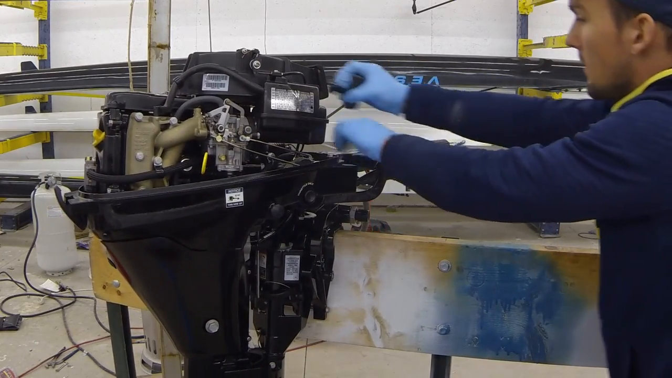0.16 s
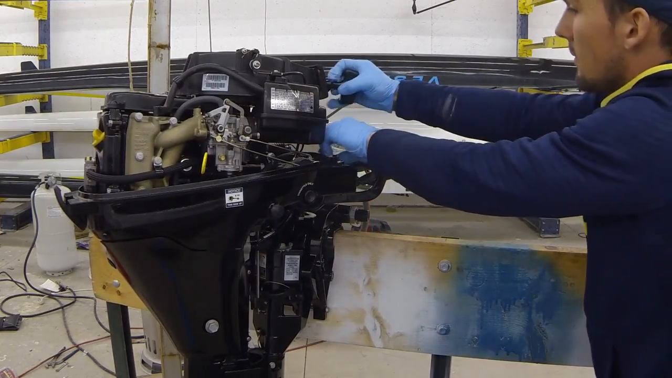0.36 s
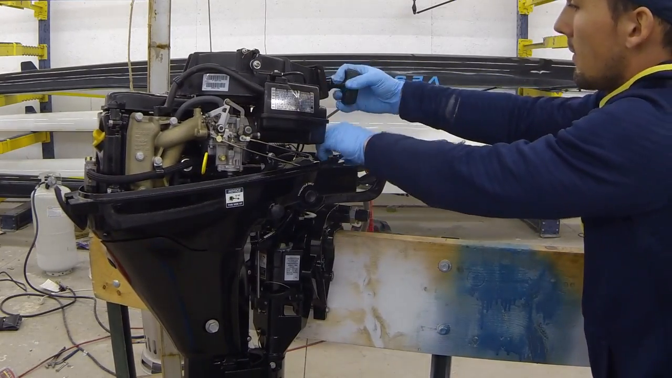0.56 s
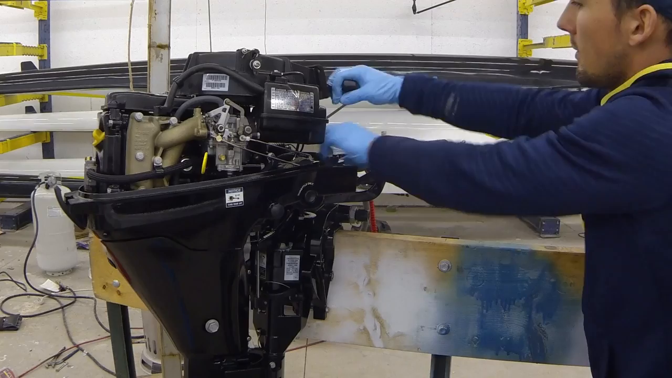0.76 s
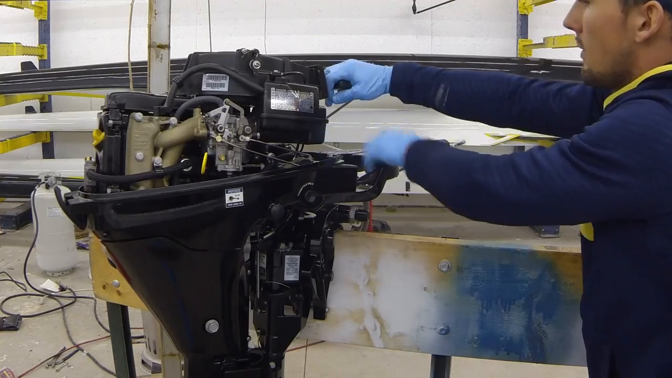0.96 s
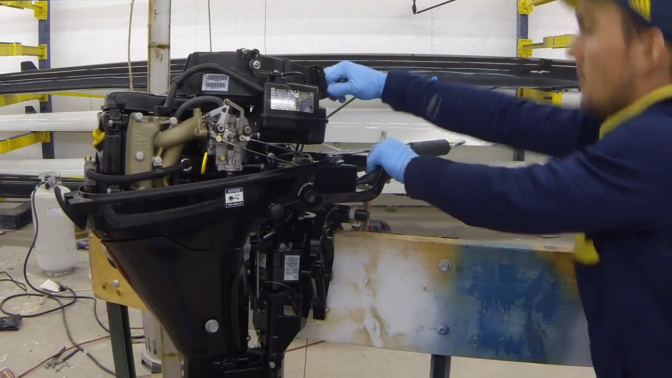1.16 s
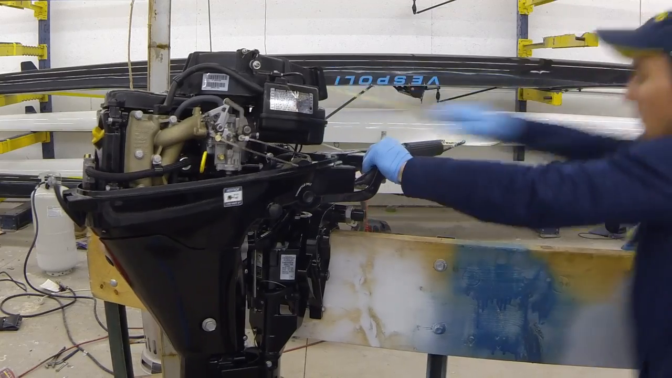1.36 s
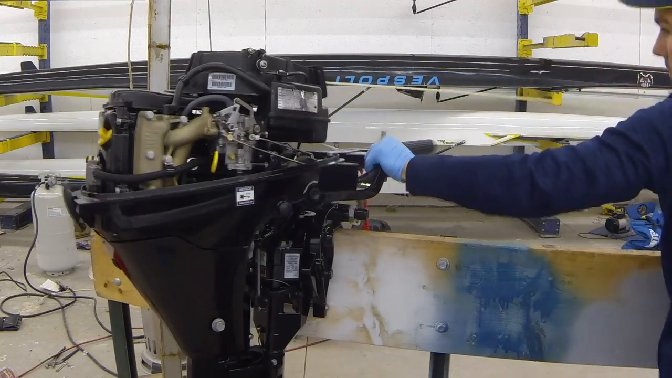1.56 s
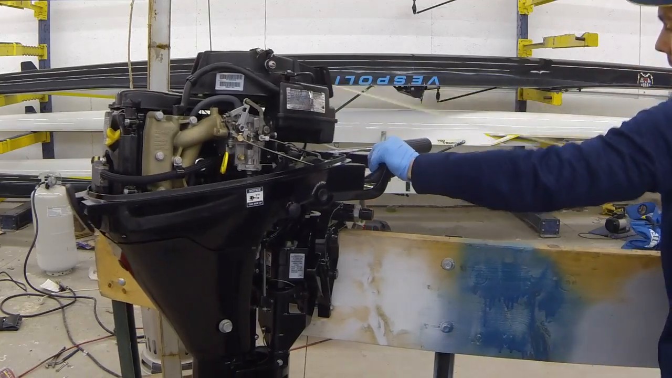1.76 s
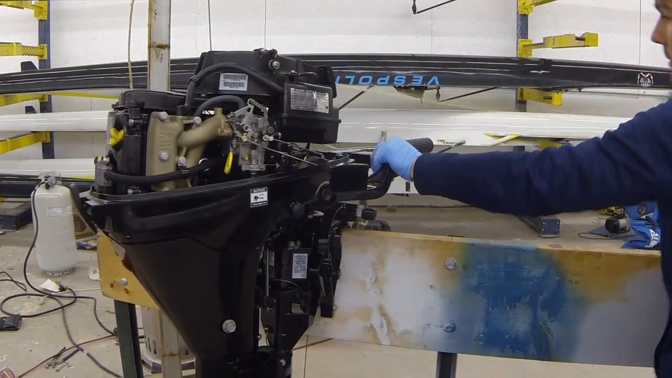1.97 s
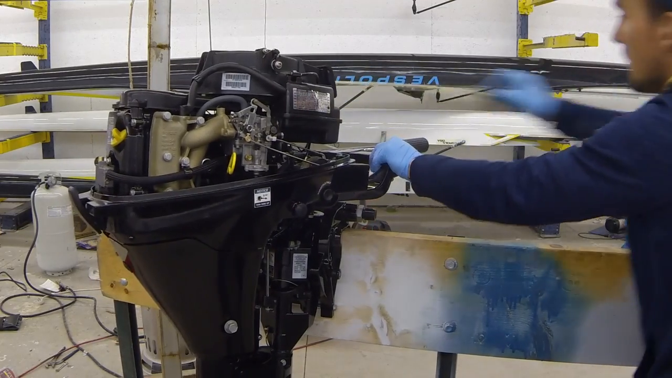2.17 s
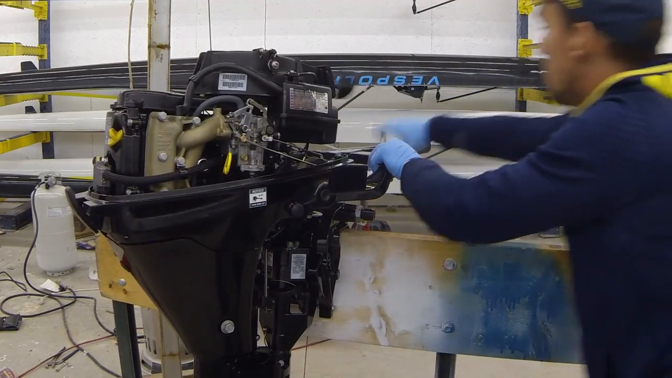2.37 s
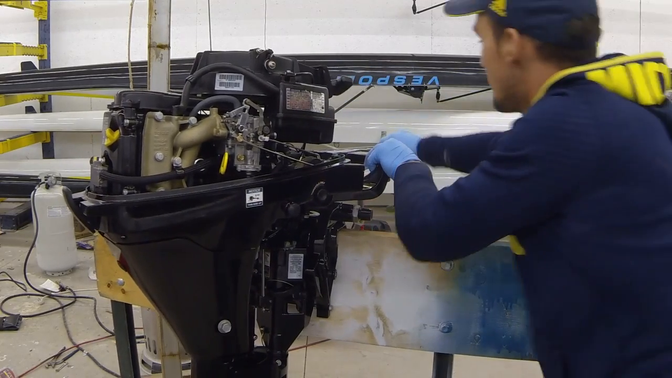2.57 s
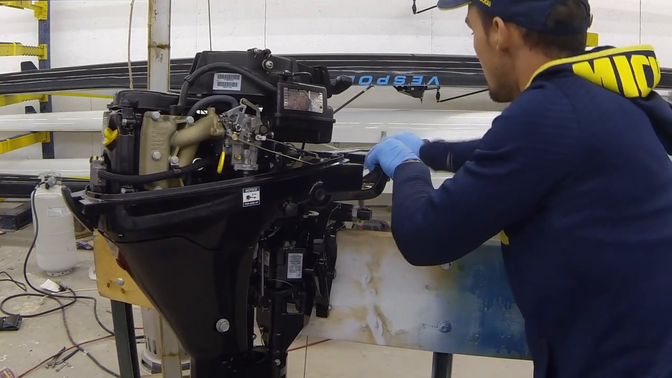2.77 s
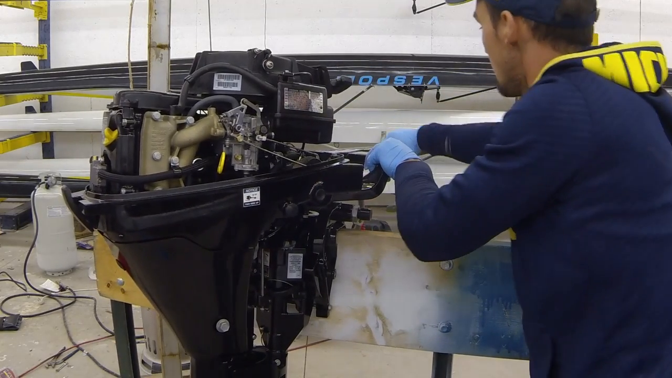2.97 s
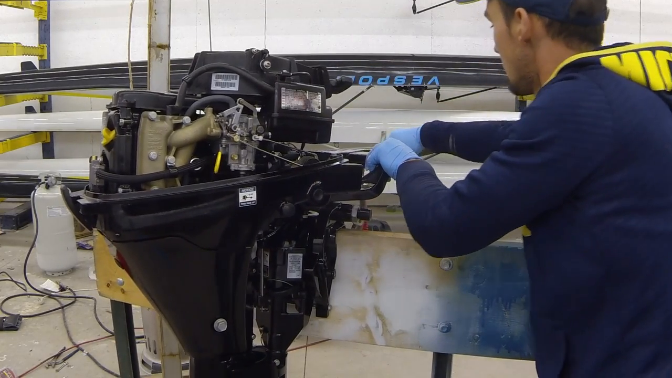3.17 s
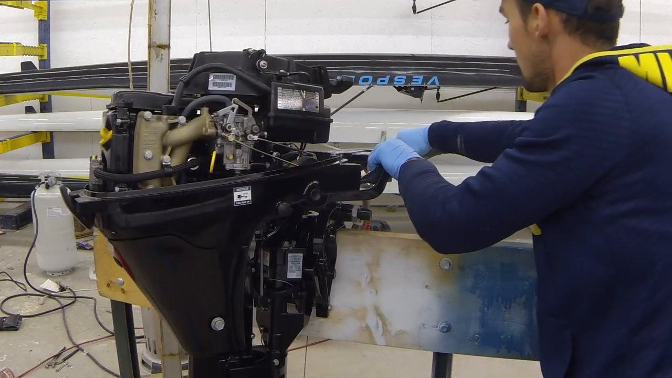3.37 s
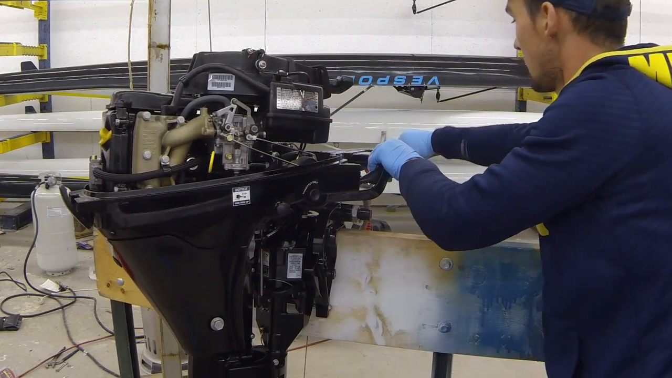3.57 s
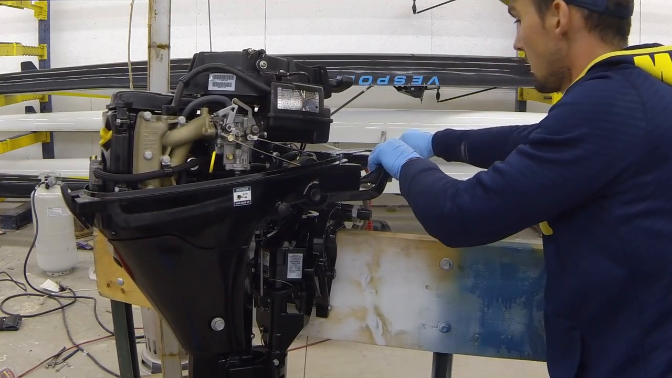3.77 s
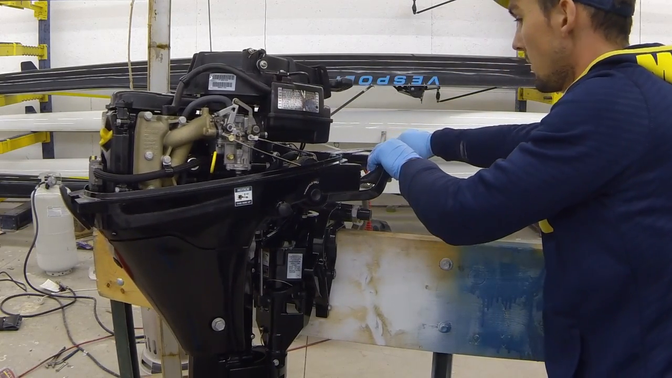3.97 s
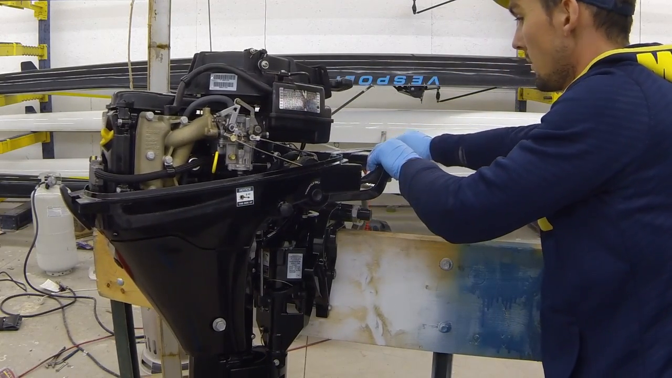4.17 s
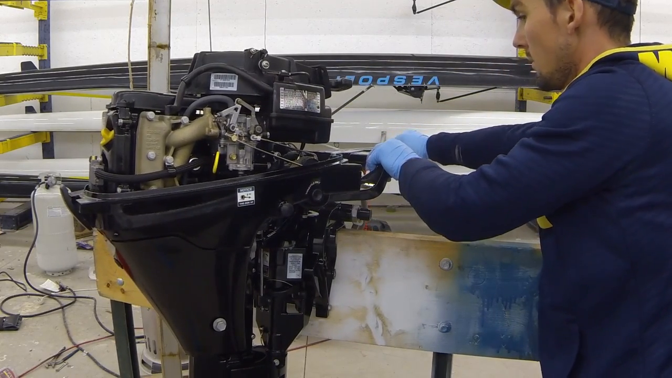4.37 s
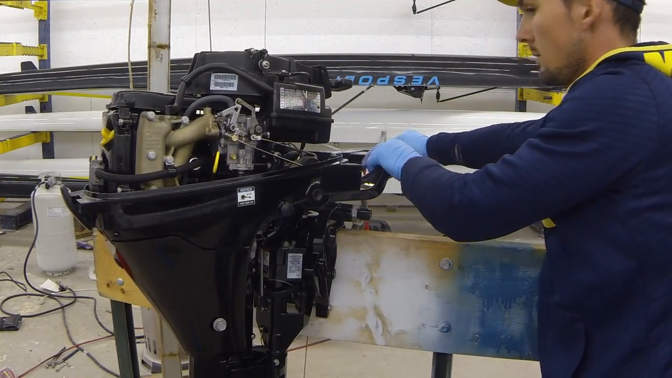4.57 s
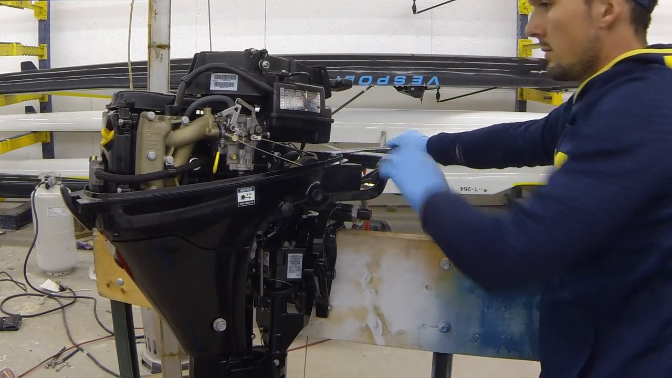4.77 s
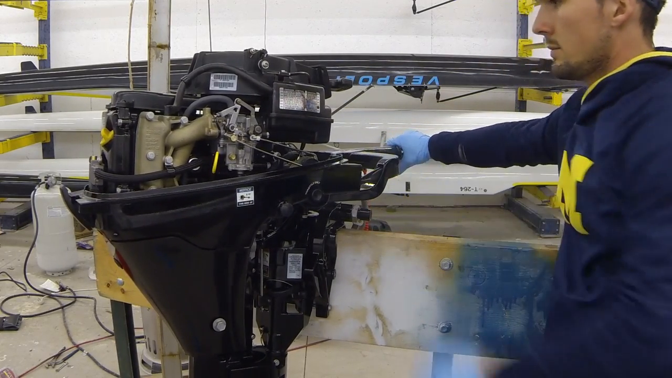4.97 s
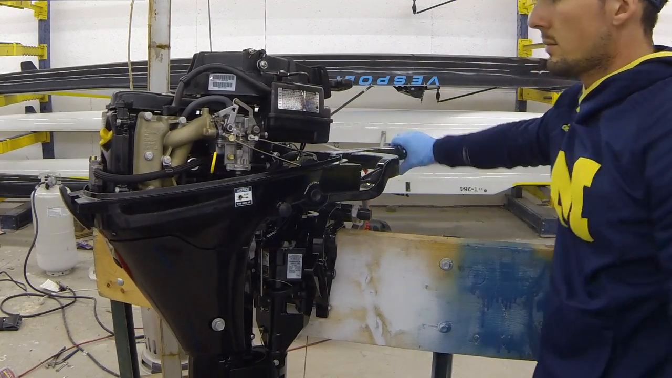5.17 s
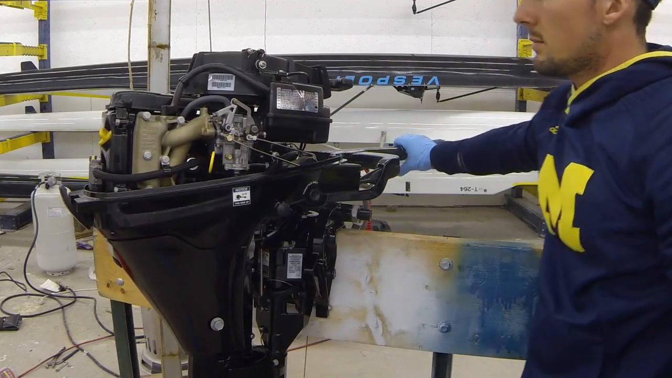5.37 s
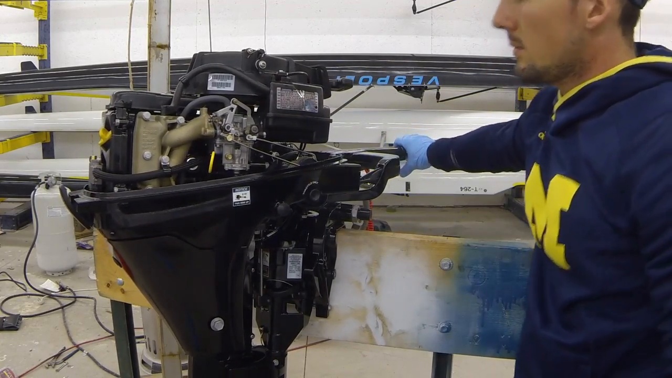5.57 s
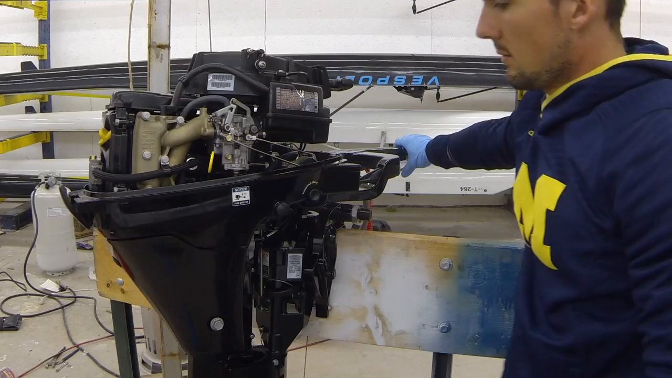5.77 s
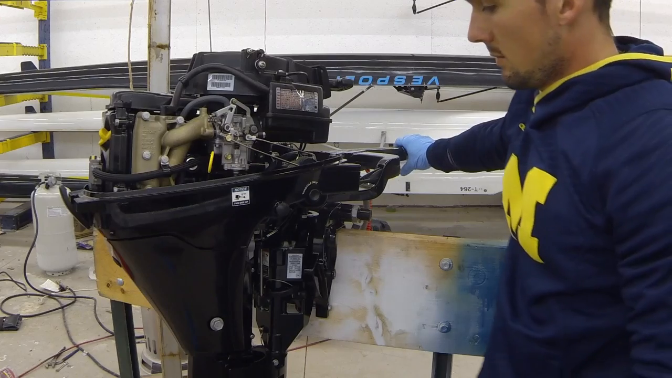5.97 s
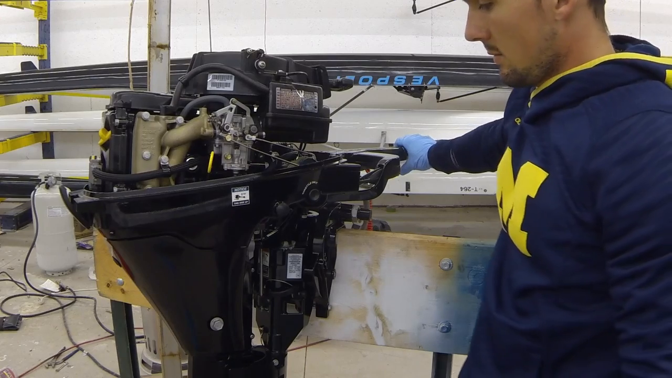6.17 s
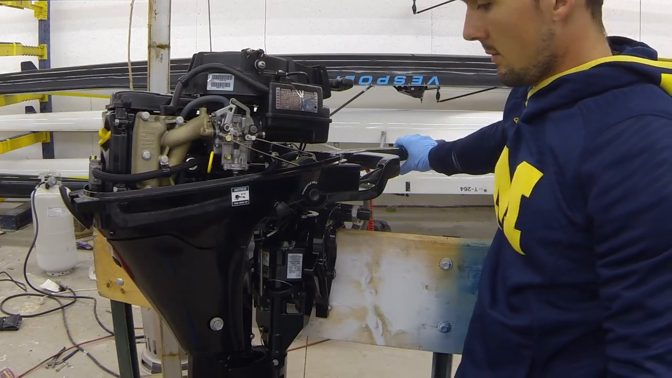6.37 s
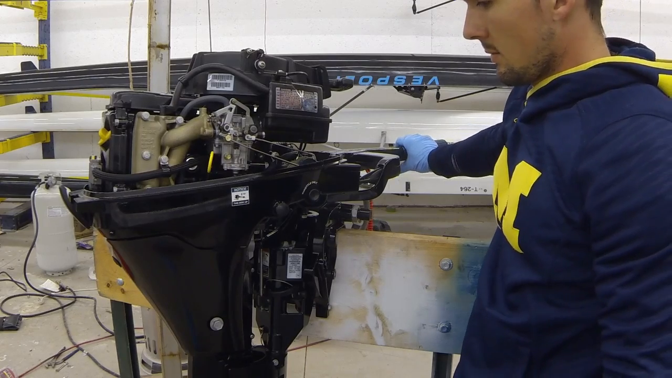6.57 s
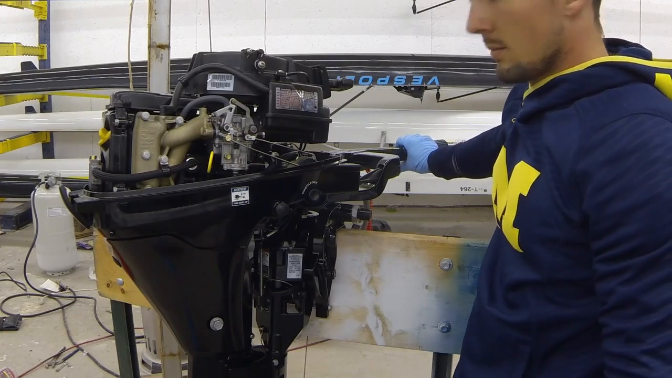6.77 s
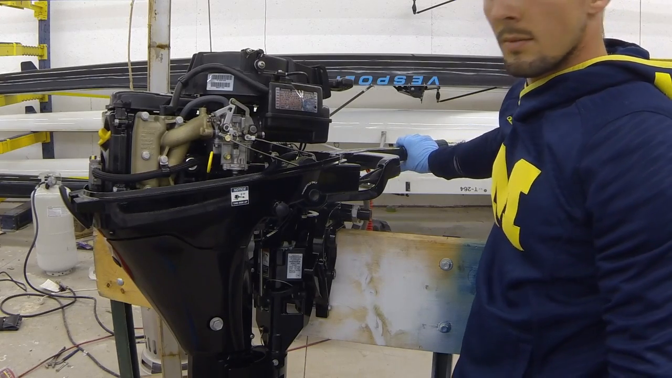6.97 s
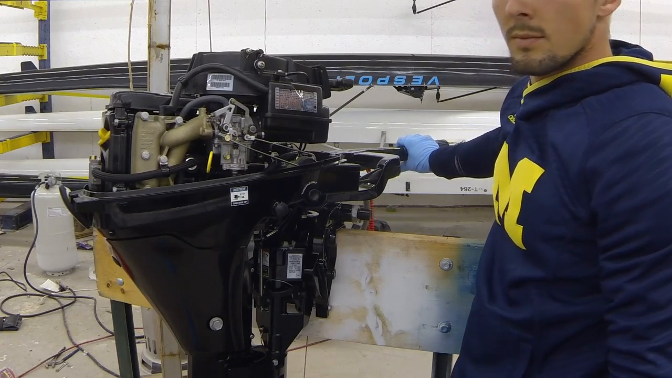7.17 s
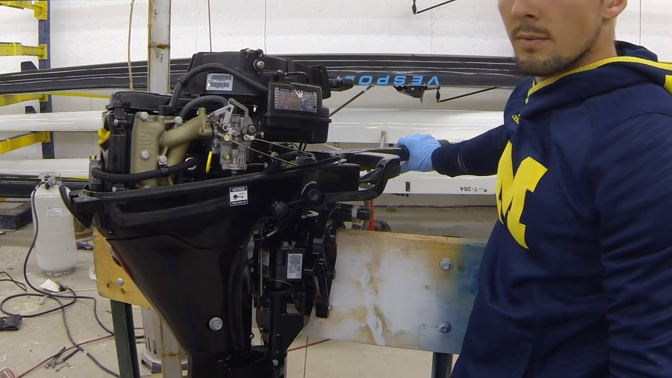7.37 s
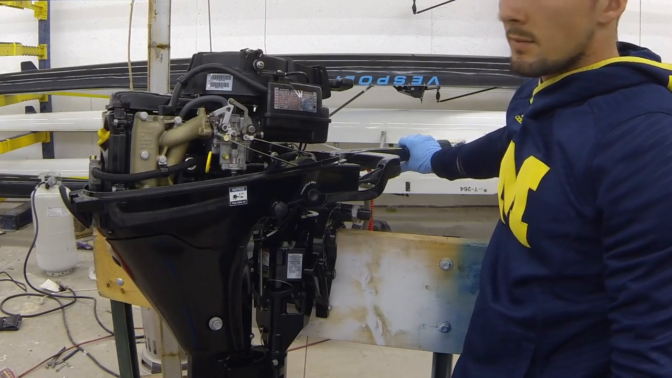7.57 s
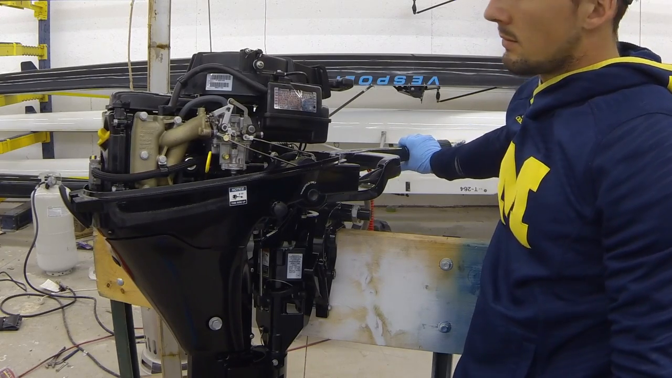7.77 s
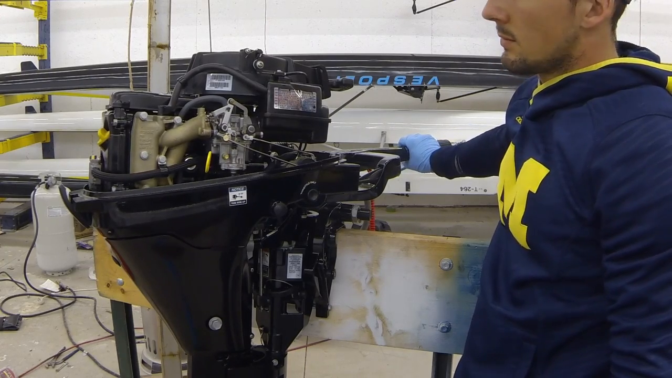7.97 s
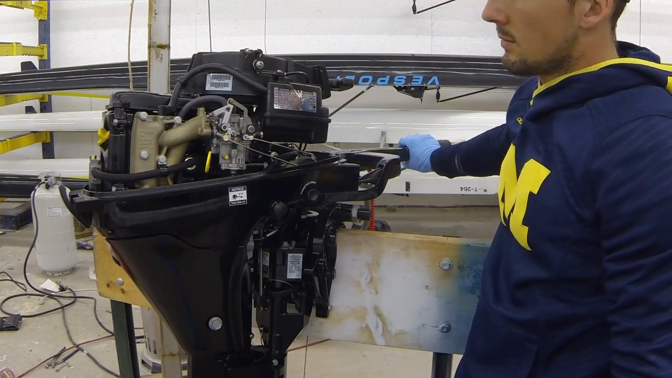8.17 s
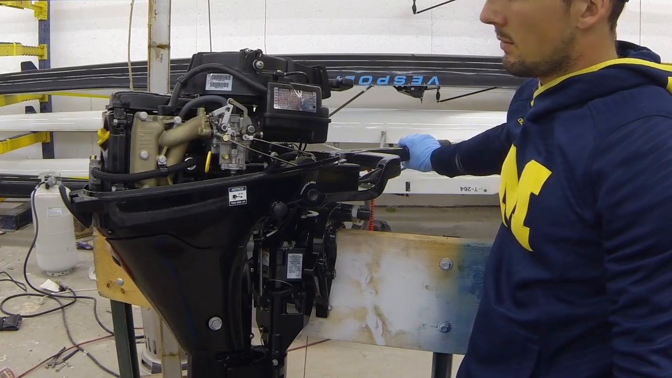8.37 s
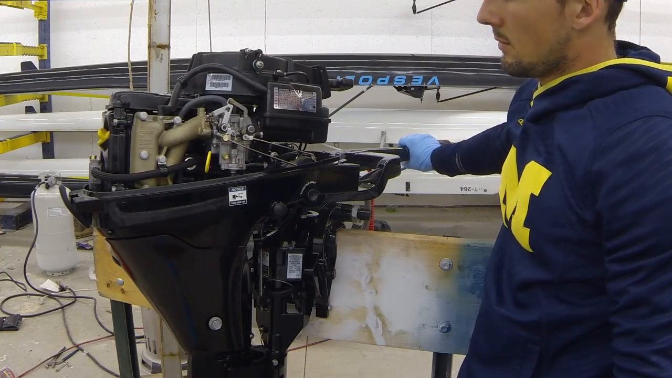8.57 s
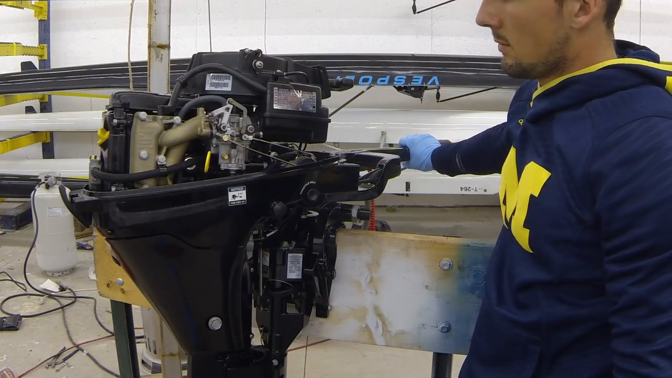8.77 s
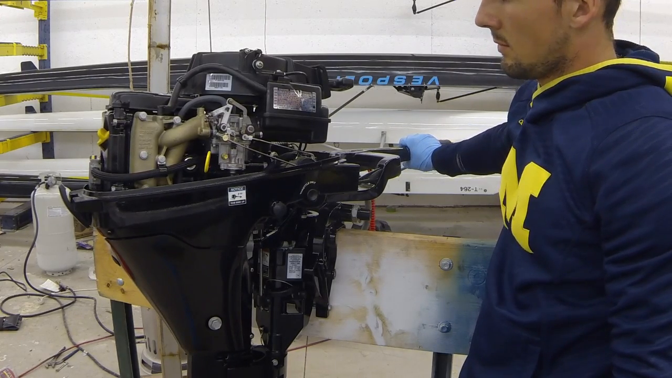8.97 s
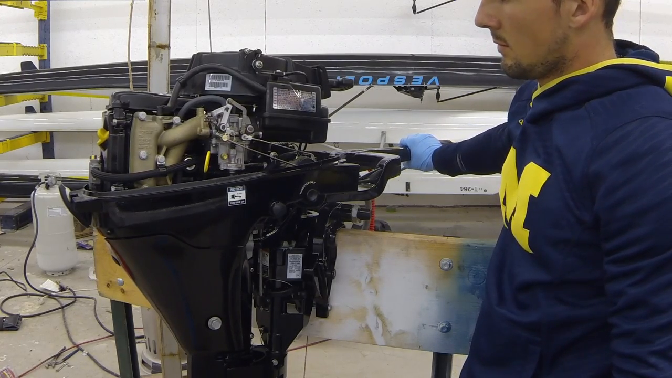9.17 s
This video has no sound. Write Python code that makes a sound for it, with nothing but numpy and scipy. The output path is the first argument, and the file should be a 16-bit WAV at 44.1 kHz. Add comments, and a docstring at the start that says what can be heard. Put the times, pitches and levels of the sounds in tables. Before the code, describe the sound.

Starter knocks and a rope whirr fire up a small outboard engine, which races with misfires, sags, and recovers to an even putter.

```python
"""In a workshop, a small twin-cylinder outboard motor is started on a stand. The handle knocks home twice,
exciting the housing's modes, and the rope spins a whirring pulley. The motor catches, races with misfires,
nearly stalls, and settles to an even run that sags at the end. Each firing is an impulse: a puff drives
the air column of the dry exhaust leg, a knock drives the bare block, and a gulp of air sounds the intake.
The room reverberates over a low rumble."""
import sys
import numpy as np
from scipy import signal
from scipy.fft import rfft, irfft, next_fast_len
from scipy.io import wavfile
from scipy.ndimage import uniform_filter1d

SR = 44100
rng = np.random.default_rng(int(sys.argv[2]) if len(sys.argv) > 2 else 0)


def waveform_to_disk(signal):
    """Save audio, clipped to [-1, 1], as 16-bit WAV at the path in sys.argv[1]."""
    frames = np.transpose(np.atleast_2d(signal))
    scaled = np.clip(frames, -1, 1) * 32767
    samples = np.round(scaled).astype(np.int16)
    wavfile.write(sys.argv[1], SR, samples)


N = 407043
TIME = np.arange(N) / SR
CHOKE_OFF_S, CHOKE_FADE_S = 3.58, 0.466
COASTING_DB = 18  # softness around which the motor coasts

# Relative spectra of room noise and of an earlier knock's ring (frequency [Hz], density [dB])
ROOM_SPECTRUM = [(8.8, -36), (15, 7), (48, 8), (152, -9), (186, -18), (215, -14.5), (339, -16.5),
                 (951, -16), (1200, -13), (1730, -22.5), (14000, -40.5)]
RING_SPECTRUM = [(150, -46), (250, -17), (548, -9), (634, -7), (920, -15), (2180, -18), (2530, -21),
                 (2670, -24), (6000, -37), (7800, -37), (13200, -120)]
# Reverberation of the workshop (frequency [Hz], T60 [s])
ROOM_DECAY = [(100, 1), (600, 1), (1500, 0.78), (4000, 0.83), (10000, 0.68)]
# Blows of handle and pawl (time [s], level [dB], low modes [dB], ping [dB], high modes [dB])
STARTER_KNOCKS = [(0.246, -20.5, 3, 4, -18), (0.89, -30.5, -3, 3.5, -18), (0.901, -35.5, -21, -12, -8),
                  (1.245, -48, -11, 15, 15), (1.299, -44, 0, -7, -7), (1.331, -35, -23, 14, 8),
                  (1.365, -17, 8, 10, 7), (1.369, -8, -4, 7, 6.5), (1.382, -19, 3, 12, 3),
                  (1.601, -17, -5, -1, -7), (1.61, -10.5, -31, -7, -3), (1.641, -18, -23, -4, 8),
                  (1.691, -33, -16, -23, -28)]
# Modes of the starter housing (frequency [Hz], level [dB], T60 [s])
HOUSING_MODES = [(474, 4, 0.035), (631, -4.5, 0.3), (682, 8, 0.09), (856, -16, 0.014), (980, 8, 0.026),
                 (1123, 6, 0.076), (1222, 1, 0.031), (1360, 13.5, 0.03), (1435, 17, 0.031),
                 (1508, 17.5, 0.025), (2020, 2, 0.017), (2910, -3, 0.016), (3093, 1.5, 0.016),
                 (4000, 7.5, 0.01), (4940, 0, 0.013), (7660, -27, 0.057)]
# Relative spectrum of the pulley (frequency [Hz], density [dB])
PULLEY_SPECTRUM = [(35, -33), (60, -9), (114, -7), (417, -12), (658, -3), (927, -9), (1460, -9),
                   (1840, -15), (2160, -7.5), (7740, -40), (14000, -68)]
# Pitch of its whirr (time [s], frequency [Hz])
WHIRR_PITCH = [(1.39, 1390), (1.45, 1360), (1.5, 1580), (1.55, 1140), (1.7, 1600)]
# Speed of the motor (time [s], firing rate [Hz])
FIRING_RATE = [(1.45, 8.3), (1.597, 13.16), (1.703, 24.25), (1.788, 22.4), (1.978, 26.68), (2.222, 45.07),
               (2.513, 49.09), (2.871, 44.76), (3.058, 48.88), (3.068, 46.58), (3.25, 39.43), (3.42, 28.83),
               (3.58, 23.68), (3.74, 17.08), (3.9, 21.46), (4.1, 25.5), (4.3, 32.0), (4.45, 33.69),
               (4.8, 34.18), (5.1, 34.39), (5.4, 34.4), (5.7, 34.51), (5.85, 33.6), (6.0, 34.66),
               (6.25, 34.56), (6.5, 34.75), (6.75, 34.73), (7.0, 34.6), (7.15, 34.76), (7.3, 35.2),
               (7.5, 34.77), (7.8, 35.56), (8.05, 35.23), (8.3, 35.87), (8.5, 34.94), (8.7, 34.52),
               (8.85, 31.88), (9.0, 29.68), (9.23, 27.23)]
# Strength of firing (time [s], puff [dB], knock [dB])
FIRING_LOAD = [(1.5, -45.5, -42), (1.58, -30, -54), (1.63, -19, -17.5), (1.73, -18, -18), (1.82, -22, -25),
               (2.04, -17, -20), (2.4, -14, -23.5), (2.72, -17.5, -23.5), (2.87, -23, -37.5),
               (2.91, -15.5, -23), (3.03, -17.5, -29.5), (3.13, -19.5, -39), (3.5, -23.5, -50),
               (3.62, -23, -50), (3.72, -17, -30.5), (3.81, -21.5, -30.5), (3.88, -17, -20.5),
               (4.0, -17, -19.5), (4.3, -17.5, -25.5), (4.5, -18, -30), (5.6, -15.5, -29),
               (6.6, -14.5, -27), (8.4, -15, -29.5), (8.9, -15.5, -31.5), (9.23, -14.5, -29.5)]
# Firings that fall short or hit hard (time [s], puff change [dB], knock change [dB])
UNEVEN_FIRINGS = [(1.764, -10, -30), (1.723, -3, 1.5), (1.809, -4.5, 5), (1.852, 0, 3), (1.893, 0, 7),
                  (1.933, -1.5, 5), (1.971, -2, 1), (2.008, -4, 2.5), (2.04, -1, 1), (2.072, 3, -0.5),
                  (2.1, -2, 2.5), (2.126, 4.5, 3), (2.176, 0.5, -1), (2.223, -2, 1.5), (2.246, -4, -0.5),
                  (2.268, -2.5, 1.5), (2.289, -8, -3), (2.311, -2, 2.5), (2.332, -1.5, 1), (2.353, -2, -7),
                  (2.395, -1.5, -0.5), (2.416, -1, 2), (2.437, -6, -21), (2.458, -3.5, -1),
                  (2.479, -3, 0.5), (2.52, -6.5, -11), (2.541, -1, 0), (2.561, -29, -17), (2.582, 1.5, 3),
                  (2.602, -37, -20), (2.687, -43, -15), (2.729, -25, -8), (2.75, 5, 4.5), (2.772, -29, -30),
                  (2.816, -27, -4), (2.86, -33, -2), (2.906, -0.5, 1.5), (2.928, -2.5, 1), (2.949, -10, -8),
                  (3.075, -2, -6), (3.097, -5, 2), (3.444, -7, -21), (3.477, -8, -10), (3.559, -3.5, 2),
                  (3.519, -6, 7), (3.602, -6, 4), (3.647, -4.5, 5.5), (3.698, -5, -1), (3.755, -9.5, -3.5),
                  (3.907, 0, 1), (3.952, -0.5, -0.5), (3.996, -3, -4), (4.038, -0.5, -3.5), (4.079, 0, 0),
                  (4.226, -1.5, 1.5), (4.291, 1.5, 1), (4.353, 1, 0), (4.827, 2, 3), (5.003, 0.5, 4),
                  (5.41, 1, 2), (5.47, 1, 1.5), (5.586, 0.5, 4), (6.169, -0.5, 3), (6.544, -1, 0),
                  (6.573, -0.5, 3.5), (6.688, 0.5, 0), (6.745, 1.5, 0), (6.802, 2, 3), (6.861, -1, 2.5),
                  (6.919, -0.5, 3.5), (6.976, -1, 2), (7.033, 0.5, 0.5), (7.092, 1.5, 3.5), (7.293, 0.5, 1),
                  (7.521, -0.5, 4), (7.608, 0.5, 2.5), (7.663, 1.5, 3.5)]
# Intake resonance (time [s], frequency [Hz], drive relative to the puff [dB])
INTAKE_NOTE = [(1.6, 840, 9.5), (2.0, 830, 8.5), (2.2, 855, 7), (2.7, 837, 4.5), (3.03, 858, 6),
               (3.18, 774, 3), (3.5, 726, 4), (3.75, 830, -3), (4.1, 820, 2), (6.0, 820, -2.5),
               (8.0, 819, -3.5), (9.23, 820, -3)]
# Modes of the block (frequency [Hz], bandwidth [Hz], gain on choke [dB], gain off choke [dB])
BLOCK_MODES = [(620, 254, -3.5, -10.5), (705, 150, -26, -9), (1147, 59, -20, -4), (1284, 110, -38, -1),
               (1363, 164, -2, -29), (1614, 99, -3.5, -0.5), (1793, 180, -3, -16), (2137, 120, -7, -1.5),
               (2403, 196, -0.5, -3.5), (2693, 190, -6, -5), (3068, 400, -9.5, -11.5), (3445, 81, -6.5, -9),
               (3696, 110, -8.5, -9.5), (4260, 91, -9.5, -30), (4680, 330, -12.5, -9.5),
               (5235, 310, -10.5, -12), (5670, 82, -15, -9.5), (5850, 115, -10, -18),
               (6670, 150, -15.5, -15), (7920, 1170, -19, -19), (10000, 2800, -26.5, -25.5)]
# Valve gear rattle (time [s], level [dB])
VALVE_RATTLE = [(1.45, -48), (1.8, -55), (2.2, -34.5), (3.0, -32.5), (3.3, -34), (3.5, -39.5),
                (3.75, -38.5), (4.0, -26), (4.4, -31.5), (8.6, -31.5), (9.23, -34.5)]
# Relative spectrum of the broadband rattle (frequency [Hz], density [dB])
RATTLE_SPECTRUM = [(40, -29), (240, 0.5), (400, -8.5), (1900, -14.5), (2660, -12), (4050, -17),
                   (4760, -19.5), (8280, -23.5), (13000, -28.5)]
# Reflections in the leg, inverted by the open end (delay [ms], amplitude [ratio])
LEG_ECHOES = [(2.45, -.8), (7.2, .8), (12.7, .3), (23.2, .21)]
STALL_ECHOES = [(-2.1, .45), (3.1, -1.15), (7.8, .35), (12.9, .3), (23.5, .15)]  # near a stall the valve cracks open early
CHOKE_ECHOES = [(-2.6, -.2), (2.5, -.2), (6.2, .4), (8.3, -.25)]
# Suction pulse (time [s], level relative to the puff [dB])
SUCTION_LEVEL = [(1.45, -8), (2.0, -16), (2.4, -8), (2.87, -6), (2.91, -9), (3.13, -9), (3.3, -1),
                 (3.55, 4), (3.72, -8), (3.88, 0), (4.3, -11.5), (4.5, 3.5), (8.7, -1), (9.23, -1.5)]
# Exhaust bass (time [s], gain [dB])
BASS_GAIN = [(1.5, 3.5), (2.1, 6), (2.6, -1.5), (3.1, 6.5), (3.8, -2.5), (4.3, 6), (4.7, 1.5), (6.0, -0.5),
             (7.0, -1), (8.0, 4), (8.7, 1), (9.23, 0)]
# Response of a small housed microphone (frequency [Hz], gain [dB])
MIC_RESPONSE = [(25, 1.5), (45, -3), (70, 2.5), (110, 1.5), (9000, -1), (12000, -12), (15000, -24)]


def amp(db):
    """Decibels to amplitude ratio."""
    return 10 ** (np.asarray(db) / 20)


def unit_rms(x):
    """Normalisation to rms 1."""
    return x / np.sqrt(np.mean(x ** 2) + 1e-20)


def at_hz(table, hz):
    """Interpolation on a log-frequency axis."""
    f, value = np.transpose(table)
    return np.interp(np.log(hz + 1), np.log(f + 1), value)


def curve(table, column=1, before=-120):
    """Linear interpolation of a column over time."""
    rows = np.array(table)
    return np.interp(TIME, rows[:, 0], rows[:, column], left=before)


def filtered(x, spectrum):
    """Filtering by multiplication of spectra."""
    size = next_fast_len(N)
    return irfft(rfft(x, size) * amp(at_hz(spectrum, np.fft.rfftfreq(size, 1 / SR))), size)[..., :N]


def cut(x, order, hz, kind="low"):
    """Zero-phase filtering, forward then backward."""
    return signal.sosfiltfilt(signal.butter(order, hz, kind, fs=SR, output="sos"), x)


def resonate(x, hz, width, stages=1):
    """Resonance by heterodyning: each stage shifts hz to zero, smooths, and shifts back."""
    turn, pole = np.exp(2j * np.pi * np.cumsum(hz * np.ones(N)) / SR), np.exp(-np.pi * width / SR)
    for _ in range(stages):
        x = 2 * (turn * signal.lfilter([1 - pole], [1, -pole], x / turn)).real
    return x


def train(at, size):
    """Impulse train at the given samples."""
    return np.bincount(np.clip(at, 0, N - 1), size, N)


def burst(at, size, rise_s, fall_s):
    """Transient envelope: vibration swells and decays after each stroke."""
    t = np.arange(1500) / SR
    swell = (t / rise_s) * np.exp(1 - t / rise_s)
    tail = 0.5 * (1 - np.exp(-t / rise_s)) * np.exp(-t / fall_s)
    return signal.oaconvolve(train(at, size), swell + tail)[:N]


def wander():
    """Slow random modulation: twelve summed sines, rms 1."""
    hz, phase, steps = np.geomspace(0.3, 2.5, 12), rng.random(12), TIME[::441]
    return unit_rms(np.interp(TIME, steps, np.sin(2 * np.pi * (np.outer(steps, hz) + phase)).sum(axis=1)))


def scatter(at):
    """Gaussian variation, one value a stroke."""
    return rng.standard_normal(400)[:len(at)]


def room_noise():
    """Steady rumble and air, with the exponential decay of an earlier knock."""
    air, ring = rng.standard_normal((2, N))
    return (amp(-48.5) * unit_rms(filtered(air, ROOM_SPECTRUM))
            + amp(-48 - 33 * TIME) * unit_rms(filtered(ring, RING_SPECTRUM)))


def reverberation(x):
    """Diffuse reflection: sparse echoes of random sign, each band decaying at its own rate."""
    taps = np.zeros(SR)
    at = np.arange(400, SR - 20, 20) + rng.integers(0, 20, (SR - 401) // 20)
    taps[at] = rng.choice([-1., 1.], len(at))
    hz, t, bands = signal.stft(taps, SR, nperseg=256)
    tail = signal.istft(bands * amp(-60 * t / at_hz(ROOM_DECAY, hz)[:, None]), SR, nperseg=256)[1]
    return signal.fftconvolve(x, tail / np.linalg.norm(tail))[:N]


def starter_knocks():
    """Impact excitation: handle and pawl set the housing's damped modes ringing."""
    t, out = np.arange(6000) / SR, np.zeros(N + 6000)
    spots = rng.uniform(-0.39, 1, (len(STARTER_KNOCKS), len(HOUSING_MODES)))  # each blow lands elsewhere
    clack_band = signal.butter(4, [500, 1900], "band", fs=SR, output="sos")
    for (start_s, db, low_db, ping_db, high_db), spot in zip(STARTER_KNOCKS, spots):
        click = amp(high_db - 8) * rng.standard_normal(len(t))
        clack = amp(11) * signal.sosfilt(clack_band, rng.standard_normal(len(t)))
        ring = (click + clack) * np.exp(-t / 0.012)
        for (hz, mode_db, t60), shift in zip(HOUSING_MODES, spot):
            tilt_db = low_db * (hz < 1200) + ping_db * (2500 < hz < 3500) + high_db * (hz > 3500)
            envelope = amp(mode_db + tilt_db - 60 * t / t60) * np.minimum(t * hz / 4.5, 1)
            ring += envelope * np.sin(2 * np.pi * hz * (1 + 0.013 * shift) * t)
        jitter = unit_rms(uniform_filter1d(uniform_filter1d(rng.standard_normal(len(t)), 70), 70))
        chatter = amp(4.1 * jitter * np.minimum(t / 0.02, 1))  # loose parts chop the ring
        attack = np.minimum(t / 0.0041, 1) ** 0.39
        out[round(start_s * SR):][:len(t)] += amp(db - 7) * chatter * ring * attack
    return out[:N]


def pulley():
    """Noise-driven resonance: the pulley whirrs, louder as the rope tightens."""
    pull_s, taut_s, stop_s = 1.323, 1.388, 1.675
    noise = rng.standard_normal(N) * amp(3.2 * unit_rms(uniform_filter1d(rng.standard_normal(N), 150)))
    whirr = unit_rms(resonate(noise, curve(WHIRR_PITCH, before=1260), 110))
    level = amp(np.interp(TIME, [pull_s, taut_s], [-55.5, -28.5])) * (TIME > pull_s) * (TIME < stop_s)
    return level * (unit_rms(filtered(noise, PULLEY_SPECTRUM)) + 0.74 * whirr)


def choke():
    """Crossfade: 1 on the choke, 0 once it is pushed in."""
    return 1 - np.clip((TIME - CHOKE_OFF_S) / CHOKE_FADE_S, 0, 1)


def slowness():
    """Crossfade: 0 at running speed, 1 near a stall."""
    return np.clip((33 - curve(FIRING_RATE)) / 11, 0, 1)


def softness_db():
    """Level of puff over knock: small under load, large when coasting."""
    return np.clip(curve(FIRING_LOAD, 1) - curve(FIRING_LOAD, 2), 0, 30)


def strokes(phase):
    """Phase is the integral of rate: the samples where each firing cycle passes a given phase."""
    cycles = np.cumsum(curve(FIRING_RATE, before=0)) / SR - phase
    return np.flatnonzero(np.diff(np.floor(cycles)) > 0)[int(np.any(phase)):]


def firing_db(at, column, spread_db):
    """Cycle-to-cycle variation: levels scatter about the load, more widely when coasting."""
    spread_db = spread_db + 0.06 * np.maximum(softness_db()[at] - COASTING_DB, 0)
    db = curve(FIRING_LOAD, column)[at] + spread_db * scatter(at)
    for row in UNEVEN_FIRINGS:
        db[np.argmin(abs(at / SR - row[0]))] += row[column]
    return db - 10 * np.log10(curve(FIRING_RATE, before=1)[at] / 39.5)  # slower firings carry more each


def intake():
    """Cavity resonance: the open carburettor throat sounds its note at each gulp of air."""
    at = strokes(0)
    at = at + ((-0.00511 + 0.00438 * choke()[at]) * SR).astype(int)  # gulps lead, less so on the choke
    drive_db = curve(INTAKE_NOTE, 2) + 0.5 * wander()
    gulps = amp(firing_db(at, column=1, spread_db=2) + drive_db[at])
    flow = burst(at, gulps, 0.002, 0.0043) + amp(curve(FIRING_LOAD) + drive_db - 12)
    air = flow * rng.standard_normal(N) + amp(24.5) * train(at, gulps)
    return amp(5) * resonate(air, curve(INTAKE_NOTE, before=860), 91, stages=2)


def block():
    """Forced vibration: each firing shakes the block's modes in its own mix, over the valve rattle."""
    at, valves = strokes(0), strokes(0.34)
    imbalance_db = 0.6 * (-1) ** np.arange(len(at))  # the two cylinders differ
    knock = amp(firing_db(at, column=2, spread_db=1.1) + 0.05 * wander()[at] + imbalance_db)
    ticks = burst(valves, 2 * rng.random(400)[:len(valves)], 0.0042, 0.0095)
    rattle = amp(curve(VALVE_RATTLE) - 7.5) * (1 + ticks)
    mix, lag = rng.standard_normal((400, len(BLOCK_MODES))), rng.random((400, len(BLOCK_MODES)))
    mix = unit_rms(mix + 0.15 * uniform_filter1d(mix, size=3, axis=1))  # neighbours shake together
    unchoked, slow, modes = 1 - choke(), slowness(), 0
    dull_db = -0.54 * np.maximum(softness_db() - COASTING_DB + 7.5, 0)  # soft firings lose treble
    for k, (hz, width, on_db, off_db) in enumerate(BLOCK_MODES):
        arrival = at + ((0.003 * lag[:len(at), k] - 0.004) * SR).astype(int)  # each part has its moment
        size = knock * min(1, hz / 1800) * amp((3 - 0.8 * slow[at]) * np.clip(mix[:len(at), k], -1.6, 1.6))
        shake = (rattle + amp(5) * burst(arrival, size, 0.0029, 0.0071)) * rng.standard_normal(N)
        shake += amp(14) * min(1, 3000 / hz) * train(arrival + 70, size)
        slow_db = -10 if hz < 1450 else 0 if hz < 4000 else 2  # a slow crank favours the high modes
        gain_db = on_db + (off_db - on_db) * unchoked + slow_db * slow + dull_db * (hz > 6000)
        mode = np.hstack(signal.iirpeak(hz, hz / width, SR))
        modes += amp(gain_db) * signal.sosfilt([mode, mode], shake)
    clatter = rng.standard_normal(N) * (rattle + amp(-6.5) * burst(at - 150, knock, 0.0055, 0.049))
    clatter = np.std(clatter) * unit_rms(filtered(clatter, RATTLE_SPECTRUM))
    return amp(10.5) * modes + amp(-3 - 2.8 * unchoked + 0.28 * dull_db) * clatter


def puff(x, ms):
    """Pulse radiation: a bell-shaped gust is heard as a push between two shallow pulls."""
    u = np.arange(-500, 501) / SR * 1000 / ms
    return signal.oaconvolve(x, (1 - 0.91 * u ** 2) * np.exp(-u ** 2 / 2), "same")


def echoed(blows, echoes):
    """Superposition of each blow and its shifted copies."""
    return blows + sum(share * np.roll(blows, round(ms * SR / 1000)) for ms, share in echoes)


def air_column(blows, rate, slow, long, racing, coast):
    """Standing waves in the leg: racing wakes higher notes, and coasting leaves a hum."""
    modes = [(32.5, 1 + 7.1 * slow, 109, 57), (45.5, slow, 99, 25),
             (38, long * (1 - 0.27 * racing), 81, 38), (23.5, 1 + 0.5 * long, 142, 16),
             (46, coast, 120, 11), (38, coast, 2 * rate, 12),
             (43, racing, 158, 33), (45, racing, 210, 53), (46, racing, 312, 57)]
    return sum(amp(db) * resonate(blows * drive, hz, width) for db, drive, hz, width in modes)


def exhaust():
    """Pulse excitation: puffs alternating with suction drive the leg; the puffs also shake cowl and stand."""
    rate, slow = curve(FIRING_RATE, before=1), slowness()
    racing = np.clip((rate - 36) / 11, 0, 1)
    long = np.maximum(slow, TIME < CHOKE_OFF_S)  # a slow crank or rich, cold mixture lengthens the gust
    coast = np.clip((softness_db() - COASTING_DB + 3) / 6, 0, 1) * (TIME > 3)  # throttle shut
    at, later = strokes(0), strokes(0.553 + 0.053 * racing)  # suction falls later in the cycle at speed
    blows = train(at, amp(firing_db(at, column=1, spread_db=0.45)))
    suction_db = (curve(FIRING_LOAD) + curve(SUCTION_LEVEL))[later] + scatter(later)
    suction = train(later, amp(suction_db + 0.59 * (-1) ** np.arange(len(later))))
    gusts = amp(7) * puff(echoed(blows * (1 - long), LEG_ECHOES) - suction, ms=1.07)
    gusts += amp(-0.5) * puff(echoed(blows * slow, STALL_ECHOES), ms=1.13)
    gusts += amp(2) * puff(echoed(blows * (long - slow), CHOKE_ECHOES), ms=1.54)
    backflow = puff(np.roll(blows * coast, -round(0.0028 * SR)), ms=1.17)  # an empty cylinder draws first
    gusts = gusts * (1 - 0.28 * coast) - amp(-5) * backflow
    turbulence = unit_rms(puff(rng.standard_normal(N), ms=0.22))
    turbulence *= amp(curve(FIRING_LOAD) - 12.5 + 0.52 * softness_db())
    muffled = cut(gusts + turbulence + air_column(blows, rate, slow, long, racing, coast), order=5, hz=335)
    muffled += (amp(curve(BASS_GAIN, before=0)) - 1) * cut(muffled, order=3, hz=125)
    harmonic = resonate(blows * (1 - long) ** 4, 13 * rate, 16)
    cowl = amp(33 + 4.5 * wander()) * resonate(harmonic, 457, 43)  # one order hums through a panel
    leak = amp(13.5) * resonate(blows, 610, 260, stages=2)  # the puff's edge passes the casing
    leak += amp(-14) * resonate(turbulence, 420, 310)
    stand = amp(28.5) * resonate(blows, rate, 6, stages=2)  # rocks once per firing
    return cut(muffled, order=2, hz=38, kind="high") + cowl + stand + leak


def scene():
    """Superposition of direct sound, reverberation and room noise."""
    gas, engine, starter = exhaust(), block() + intake(), starter_knocks() + pulley()
    room = reverberation(amp(-13) * gas + amp(-6.5) * engine + amp(-8) * starter)
    return (gas + engine + starter + room + room_noise())[None]


def record(dry):
    """Transduction: the microphone colours the sound and saturates softly; a low-pass limits the band."""
    heard = filtered(dry, MIC_RESPONSE)
    rounded = heard / (1 + abs(heard) ** 5) ** (1 / 5)
    low_pass = signal.firwin(1023, 15100, window=("kaiser", 10), fs=SR)
    return signal.oaconvolve(0.92 * rounded, low_pass[None], "same")


dry = scene()
out = record(dry)
waveform_to_disk(out)
```